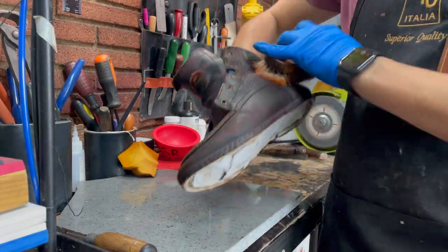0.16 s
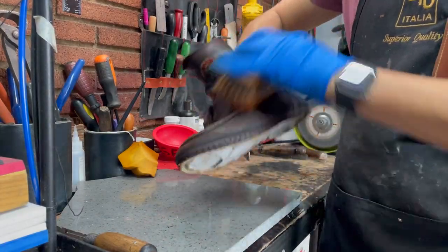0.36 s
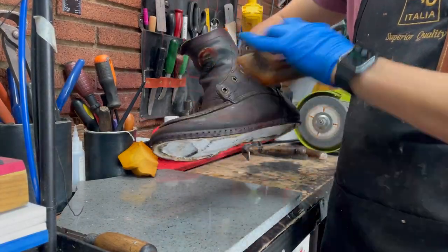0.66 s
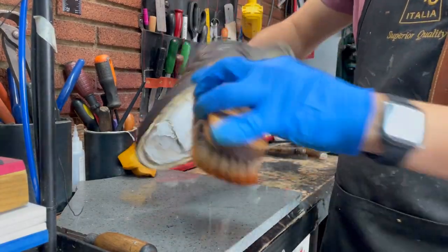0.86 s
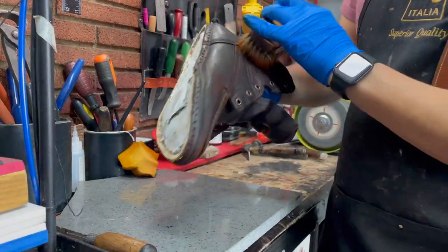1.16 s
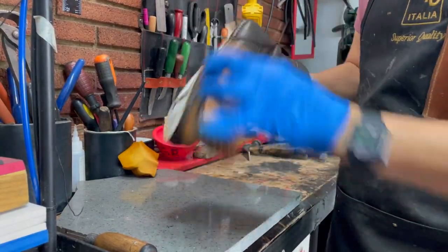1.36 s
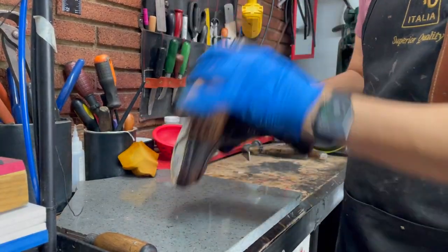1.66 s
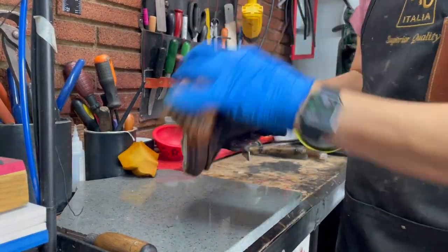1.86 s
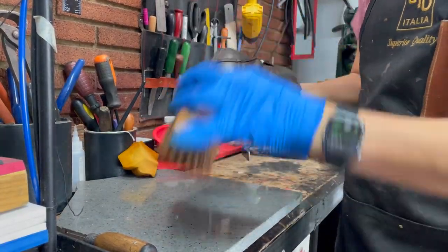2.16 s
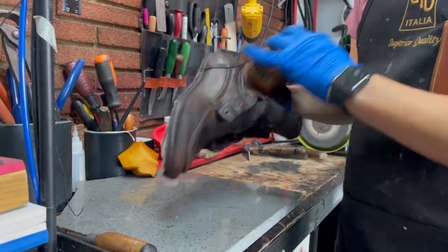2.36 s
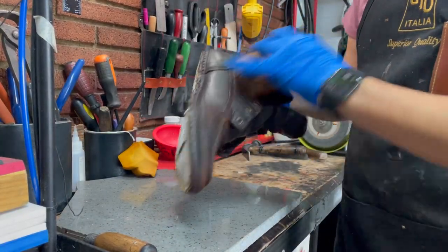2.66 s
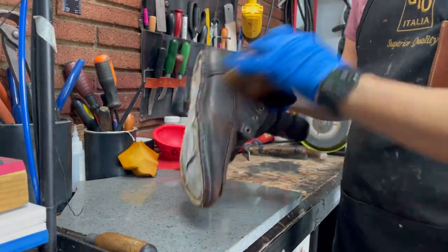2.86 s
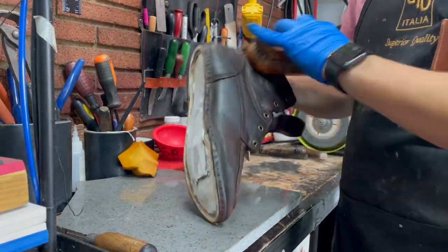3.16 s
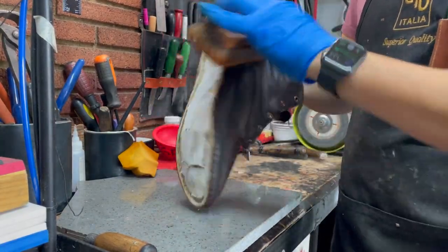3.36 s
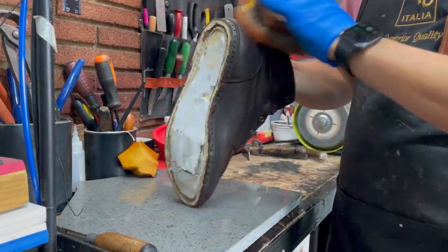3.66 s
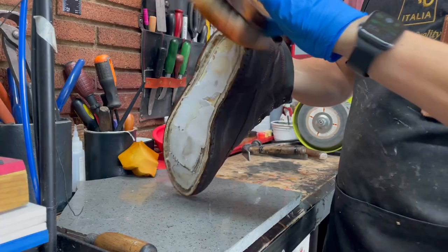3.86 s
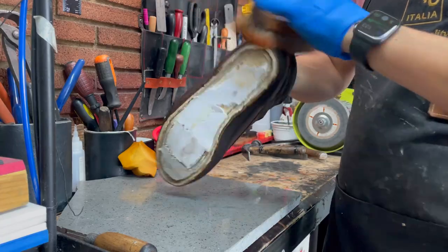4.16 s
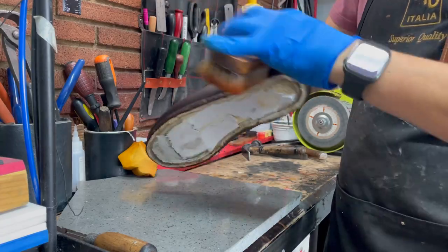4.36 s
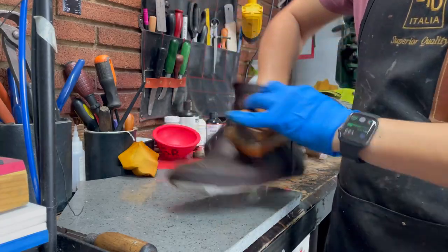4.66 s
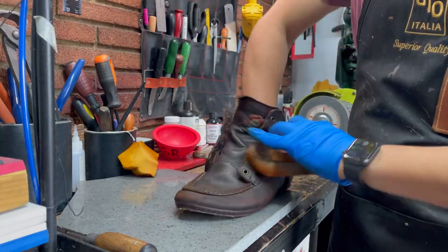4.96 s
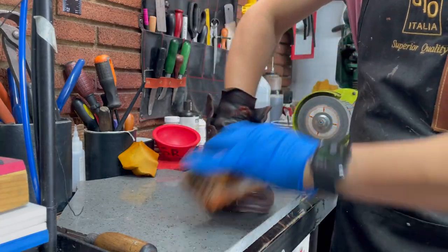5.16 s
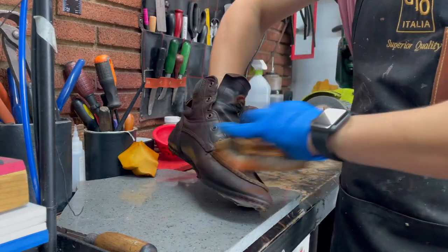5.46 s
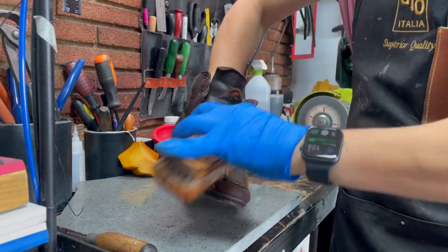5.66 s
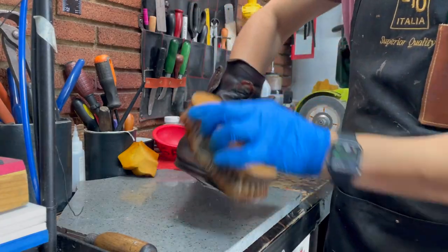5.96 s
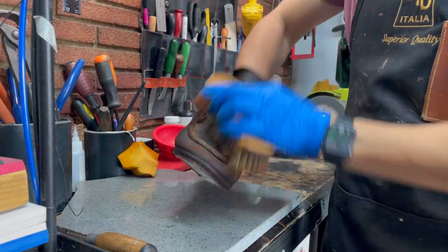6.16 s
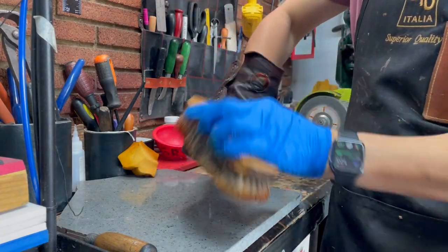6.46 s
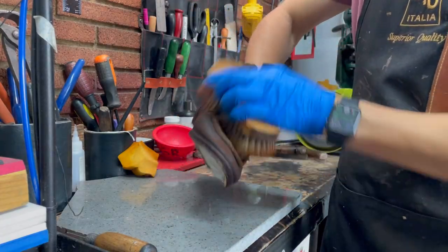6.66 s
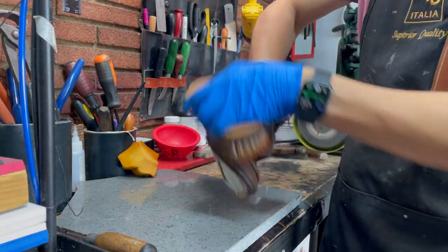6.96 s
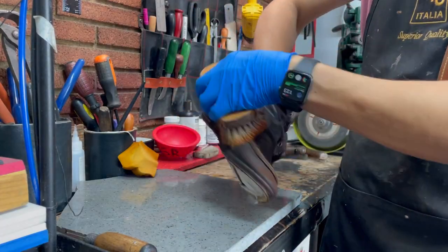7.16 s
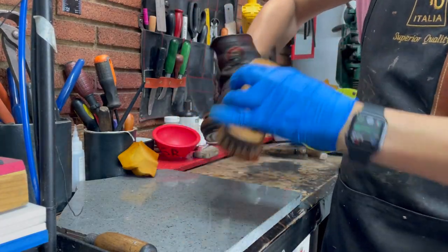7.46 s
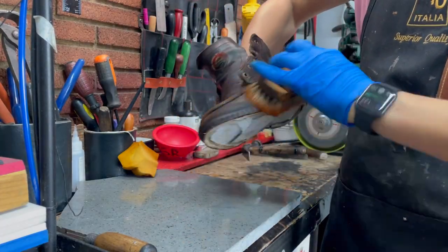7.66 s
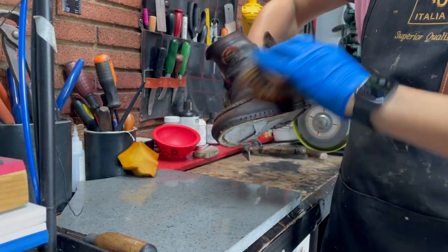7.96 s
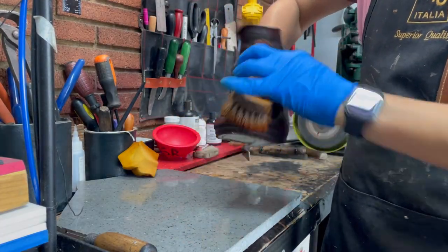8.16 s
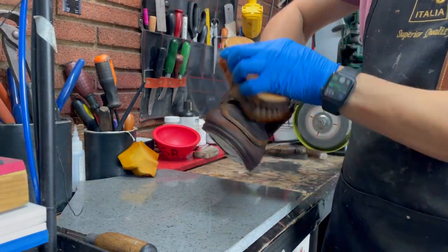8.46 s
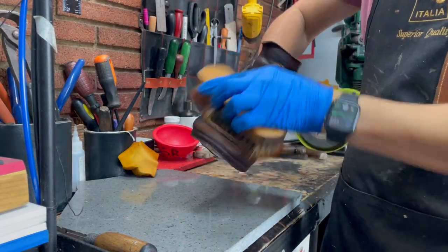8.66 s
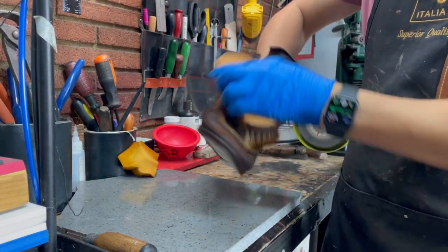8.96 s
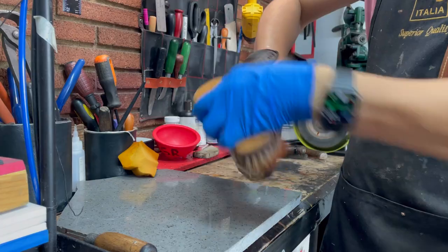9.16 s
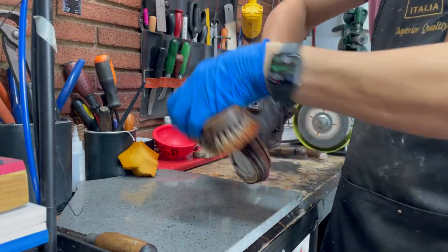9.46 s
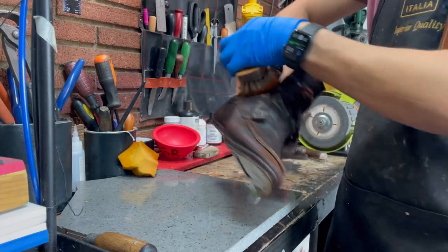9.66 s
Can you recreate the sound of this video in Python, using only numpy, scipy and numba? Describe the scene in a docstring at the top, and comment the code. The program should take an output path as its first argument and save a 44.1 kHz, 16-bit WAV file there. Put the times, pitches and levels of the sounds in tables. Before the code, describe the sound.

Close, rapid brushing on a hollow leather boot, hissing and rasping about seven strokes a second, with bumps and scuffs above a deep workshop hum.

```python
"""In a small workshop a bristle brush scrubs a leather boot close by, about seven strokes a second.
Bristle tips hiss as random clicks; pressed tufts rasp, and their drag drums on the boot's resonances.
Scuffs, scrapes and knocks are bursts or blows of force ringing in leather, eyelets or bench.
A motor hums as wavering sines, while traffic outside swells and fades as filtered noise and a low drone."""
import sys
import numpy as np
from scipy import signal
from scipy.fft import rfft, irfft, next_fast_len
from scipy.io import wavfile
from scipy.ndimage import uniform_filter1d
from numba import njit

SR = 44100
rng = np.random.default_rng(int(sys.argv[2]) if len(sys.argv) > 2 else 0)


def wav_out(sig):
    """Save sig, one row per channel (or a flat mono array), as 16-bit PCM at SR to the path in sys.argv[1]."""
    wavfile.write(sys.argv[1], SR, np.round(np.clip(np.atleast_2d(sig).T, -1, 1) * 32767).astype(np.int16))


N = 433062
TIME = np.arange(N) / SR

# All levels are mix levels; small trims follow in the functions.
# strokes, pushes and pulls alternating, levels relative to a typical stroke:
# (start [s], bristle hiss [dB], high swish [dB], tuft rasp [dB], boom of the boot [dB])
STROKES = [(0.038, 6.5, 9.5, -4, -11), (0.156, 7, 8, 2.0, -6), (0.292, 5, 6.5, 1, -5),
           (0.424, 7, 8, -1, -8), (0.562, 6, 6, -6, -4.5), (0.695, 7, 8, 3, -3), (1.033, 2, 4, 1, 0.5),
           (1.157, 6, 5.5, 6, 4), (1.301, -3.5, 3.5, 5, 4), (1.459, 2.5, 5, 6.5, 5), (1.598, -5, 1, 4, 1),
           (1.74, 1.5, 2.5, 4, 3), (1.908, 4.5, 4.5, -4, 3.5), (2.036, 4, 3.5, 3.5, -1),
           (2.198, 5.5, 4.5, 0.5, 0), (2.335, 5.5, 5.5, 4, 0.5), (2.488, 6, 6.5, 7, 4),
           (2.623, 6, 6, 5, 1.5), (2.767, 6, 5.5, 3.5, 3), (2.905, 5, 4.5, 6, 3.5), (3.05, 4, 4, 3.5, 3),
           (3.166, 0.5, 0, 4.5, 1.5), (3.316, -1, -1.5, 5.5, 3), (3.449, -3, -2, 1.5, -6),
           (3.57, -2.0, 0, -1, -1), (3.693, -3, -0.5, 1.5, 2.5), (3.832, -0.5, 1, -2, -6),
           (3.956, -2, 0.5, -6, 0), (4.089, -5.5, 0.5, 1.5, -7), (4.207, -2, 2, 0.5, 0.5),
           (4.342, 0, 1.0, 4, -2), (4.453, 4.5, 2.5, 1, -2), (4.586, -2, -0.5, 1, -13),
           (4.683, -4, -6.5, -1, 3.5), (4.772, -4, -4.5, 0, 1), (4.952, 0, 0.0, 2, 4),
           (5.113, -7, -6.5, 3, 3), (5.23, -8, -5.5, 1, 1.5), (5.38, -5.5, -5.5, -0.5, 3.5),
           (5.496, -6, -4, 4.5, 3), (5.64, -7, -4.5, 6.5, 0), (5.783, -1.5, -2, 6.5, 1),
           (5.925, -1, -2.5, 4.5, 0.5), (6.094, -0.5, -0.5, 5.5, -4), (6.234, -1, -2.5, 5, 0),
           (6.355, -0.5, -2, 3.5, -5), (6.507, 0.5, -1.5, 3, -5), (6.623, -3, -2.5, 2, 1.5),
           (6.769, -4.5, -3.5, -6, -4), (6.905, -4.0, -4.5, -10, -15), (7.037, -8, -5.5, -1, -11),
           (7.18, -7.5, -5, -5, -13), (7.322, -13, -8.5, -5, -10), (7.445, -13, -10, -12, -15),
           (7.536, -7.5, -3.5, -2.5, -2.5), (7.675, -7, -4.5, -3, -3), (7.796, -8, -3.5, -1, 1),
           (7.928, -2.5, -1, 1, -2.5), (8.071, -8, -5.5, 1.5, 1.5), (8.191, -7, -6.5, 1, -1),
           (8.312, -3.0, -5, -2.5, -1), (8.472, -3.5, -4, -2, -0.5), (8.605, -2, -4, 1, 1),
           (8.75, -4, -4, 4, -2), (8.883, -1.5, -3, -2, 3), (9.004, -5.5, -5.5, -1, 0),
           (9.125, 0.5, 0.5, 2, -5), (9.32, 4, 1, -13, 0.5), (9.479, 3, 0.5, -0.5, 4),
           (9.635, 3, 0.5, 2, 3)]
# shift of a stroke's fastest moment, later in pushes and earlier in pulls where positive:
# (time [s], shift [share of stroke])
SWING = [(0, 0.13), (1.1, 0.25), (3.1, 0.24), (3.7, 0.12), (4.34, 0.064), (4.45, -0.059), (4.68, -0.26),
         (4.77, 0.22), (4.95, 0.32), (5.25, 0.11), (7.5, 0.072), (9.6, 0.19)]
FASTEST_SHARE = 0.5  # of a stroke, before the shift
TIP_SWING = 0.78  # the free tips keep only this share of the shift, so the colour moves within each stroke
# after a turn the bristles only bend for this share of the run-up, then slip; a lower power bites harder
BEND_SHARE, BITE = 0.2, 0.59
# the brush leaves the boot once while it is turned over
LIFT_FROM_S, LIFT_TO_S, LIFT_DB = 0.834, 1.032, -7.5

# layer levels of the brush, before the stroke's own level [dB]
HISS_DB, SWISH_DB, RASP_DB, BODY_DB = -54, -53, -58, -54
SIZZLE_DB, SIZZLE_GROWTH = -54, 0.57  # the top sizzle follows the hiss, dB per dB
# extra top sizzle as the brush works over different parts of the boot: (time [s], level [dB])
SHEEN = [(0, -3), (1.2, 1.5), (1.35, 12), (1.7, 7), (2.1, 5), (3.35, 2), (3.7, 7), (4.25, 1), (4.7, -13),
         (5, 2), (7.45, 3), (7.6, 9), (7.95, 10), (8.2, -3), (9.3, 3), (9.8, -1)]
# light rustle of tips that stay on the leather: (time [s], level [dB])
RUSTLE = [(0, -69), (5.0, -64), (6.7, -71), (6.9, -67), (7.15, -67), (7.5, -69.5), (7.85, -66), (8.2, -66),
          (8.35, -69), (9.8, -74)]
# colours of the bristle sounds: (frequency [Hz], level [dB])
HISS_COLOUR = [(900, -35), (2000, -14.5), (3200, -6.5), (4200, -1), (5800, -2), (7000, 1.5), (8000, 3),
               (9000, -3), (11000, -50)]
SWISH_COLOUR = [(6500, -50), (8000, -12), (9000, 0), (10500, -2.5), (12500, -5), (14000, -16), (16000, -35)]
SIZZLE_COLOUR = [(11000, -41), (13000, -11), (14000, -5), (15500, 5.5), (17000, -4)]
RASP_COLOUR = [(150, 2), (400, -3.5), (900, -0.5), (1500, 5), (2200, 4.5), (2900, 2), (4000, -3.5),
               (7000, -9), (14000, -38)]
# rings of stiff single bristles snapping free: (frequency [Hz], level [dB])
SNAPS = [(2100, -1.5), (2700, 0.5), (3500, 1.5), (4400, -3.5), (5500, 1), (6800, 4)]
SNAP_DB, SNAPS_PER_S, SNAP_WIDTH_HZ = -58.5, 650, 560
# resonances of the hollow boot: (frequency [Hz], width [Hz], level [dB])
BOOT_MODES = [(203, 86, -16), (326, 58, -2), (417, 81, 2.5), (467, 73, -7), (541, 67, 1), (860, 220, -5.5)]

# tufts scraping over a seam or crease:
# (loudest moment [s], peak level [dB], centre [Hz], rise [s], fall to 1/e [s])
SCRATCHES = [(0.2, -45, 1980, 0.011, .01), (1.18, -38, 4320, 0.013, 0.018),
             (1.663, -36, 2357, .018, 0.0051), (1.665, -37.5, 676, .008, 0.011),
             (2.075, -41, 1920, 0.018, 0.027), (2.57, -38, 3900, 0.028, 0.016),
             (3.088, -37, 1700, .01, .018), (3.104, -32, 2350, .016, 0.017),
             (3.112, -41, 4200, 0.027, 0.013), (3.748, -46, 2605, .006, .008),
             (5.69, -41, 1299, .015, 0.035), (5.738, -37, 5000, 0.0046, 0.0078),
             (6.0, -42, 1305, .025, .02), (6.026, -40.5, 2590, 0.028, 0.036),
             (6.138, -38.5, 2410, 0.019, .025), (6.305, -42, 2096, .03, 0.037),
             (6.405, -41, 1350, 0.013, .012), (6.41, -44, 2900, 0.028, 0.014), (6.44, -38, 980, .01, .018),
             (6.537, -34, 917, .005, 0.0082), (6.572, -40, 2600, 0.028, 0.013),
             (6.785, -42, 4340, 0.0064, 0.016), (6.795, -45.5, 1600, .012, 0.018),
             (6.967, -46, 976, 0.0093, 0.017), (7.829, -41, 1540, 0.0097, 0.023),
             (8.19, -43, 2400, .03, 0.013), (8.517, -43.5, 1400, 0.0072, .014),
             (8.647, -39, 950, .005, 0.027), (8.695, -40, 2570, 0.029, .014),
             (8.819, -38, 900, 0.027, 0.013), (8.934, -42, 900, .012, 0.028),
             (8.962, -44, 2385, 0.018, .012), (9.17, -42, 954, 0.011, 0.018)]
SCRATCH_RISE_PER_S = 1.6  # the tufts stiffen as they bend, so the scrape climbs, in octaves per second
# the pressed brush catches and judders: (start [s], length [s], peak level [dB], pitch [Hz])
SCUFFS = [(0.038, 0.017, -42, 322), (0.172, 0.029, -38, 365), (0.3, 0.04, -41.5, 348),
          (0.457, .025, -45, 380), (0.712, 0.023, -43.5, 388), (1.656, 0.02, -42, 520),
          (2.232, 0.063, -41.5, 350), (2.546, 0.024, -46, 342), (2.676, 0.023, -41.5, 362),
          (2.817, 0.038, -37.5, 374), (3.082, 0.042, -44, 378), (5.541, .02, -45, 399.5),
          (5.657, .04, -39.5, 379), (5.965, 0.042, -38, 413), (6.145, .035, -40, 400),
          (6.26, 0.044, -36.5, 423), (6.392, 0.058, -38, 427), (6.542, 0.03, -34.5, 408.5),
          (7.053, 0.055, -42.5, 400), (7.949, 0.027, -42, 396), (8.236, .022, -45, 400),
          (8.403, 0.028, -39, 390), (8.509, 0.028, -39, 408), (8.643, 0.039, -37, 450),
          (8.78, 0.021, -34.5, 393), (8.81, 0.027, -39, 410), (8.92, 0.056, -36.5, 441),
          (9.059, 0.016, -43, 367), (9.152, 0.042, -40.5, 428)]
SCUFF_ATTACK_S, SCUFF_RELEASE_S = 0.0031, 0.0074
SCUFF_BEND = 0.11  # octaves the leather's pitch climbs as the brush presses through a scuff

# brush block and hand bumping the boot:
# (time [s], peak level [dB], pitch [Hz], flat slap against the ring [dB])
KNOCKS = [(0.906, -39, 540, -15), (0.919, -31.5, 517, -18.5), (1.043, -35.5, 326, -13),
          (1.222, -36, 385, -19), (1.616, -34, 423, -23), (2.108, -37.5, 372, -18), (2.966, -35, 340, -15),
          (3.054, -37, 419.7, -16), (3.890, -32.5, 350.6, -14), (4.681, -29.5, 370.7, -14),
          (4.692, -33.5, 490, -18), (4.847, -32, 526, -16), (5.027, -30.5, 360, -12),
          (5.198, -34.5, 420, -14), (6.266, -37, 433, -17), (8.232, -32.5, 416, -24),
          (8.401, -39, 397, -20), (8.672, -32.5, 437, -23)]
KNOCK_CONTACT_S = 0.012
KNOCK_SOFT_HZ = 890  # the leather cushions a knock above this
KNOCK_WIDTH_HZ = 68  # leather damps the ring within a few cycles
# the boot's heel meeting the bench: (time [s], peak level [dB])
THUDS = [(1.204, -40), (3.334, -37), (4.68, -39), (4.696, -31), (5.026, -38), (5.198, -31.5), (6.261, -37),
         (8.52, -41), (8.792, -40)]
# small hard ticks on the eyelets: (time [s], peak level [dB], contact too soft above [Hz])
TICKS = [(1.0405, -36, 14000), (3.8876, -26.5, 12000), (4.9136, -31, 2500)]
# resonances of an eyelet set in leather: (frequency [Hz], width [Hz], level [dB])
EYELET_MODES = [(1430, 410, -1), (2305, 800, -8), (3400, 470, 1), (6340, 870, -2), (10510, 1400, -10)]

# the bench top mirrors the brush: typical lag, spread of the lag as the hand moves, level
BENCH_LAG_S, BENCH_SHIFT_S, BENCH_DB = 0.0015, 0.0003, -12
# left-right phase and balance of the near sounds:
# (frequency [Hz], phase lead of left [radians], left minus right [dB])
STEREO_IMAGE = [(400, 0, -1), (1000, 0, -1), (1900, 0, 0.5), (2700, 0.55, 1.5), (4000, 0.15, 1),
                (5100, 0.7, 2), (6100, -0.1, 0.5), (7000, -1.4, 1.8), (7800, -2.95, 0), (8500, -3.35, 0),
                (9500, -4.4, 0), (11500, -6.28, 0), (13000, -7.65, 0), (14700, -9.3, 0), (16000, -9.7, 0)]
TOP_HZ = 15800  # the phone passes nothing much above this

# motor hum: (time [s], pitch [Hz], level [dB])
HUM = [(0.0, 61, -55), (0.19, 58.4, -51.5), (0.6, 58, -40.5), (1.54, 56.9, -38.5), (1.71, 59, -45),
       (1.76, 58.7, -60), (1.82, 55.8, -48), (1.95, 61.4, -51), (2.06, 59, -54.5), (2.5, 61.2, -50),
       (2.55, 57.2, -46), (2.74, 58.1, -42), (7.98, 57.4, -41.5), (9.75, 56.5, -42.5)]
HUM_DB = 0.16  # trim on the hum
# weaker machine tones: (frequency [Hz], level [dB], left-right phase [radians])
TONES = [(89.3, -62.5, 0.32), (117.2, -65.5, 1.06), (139.9, -65.5, 0.34), (456, -78, 1.1),
         (912, -68.5, 2.22)]
# swells of a higher hum that comes and goes: (middle [s], frequency [Hz], level [dB])
SWELLS = [(2.2, 226.8, -61), (4.1, 227.2, -56.5), (5.8, 225.8, -59), (7.9, 207.7, -62), (9.251, 228, -57.5)]
SWELL_S = 0.23  # time either side of the middle in which a swell falls to 1/e

# a vehicle passes outside: nearest moment, distance then, speed, and levels by layer
PASS_S, ROAD_M, SPEED_M_S = 5.1, 15.2, 10
TYRE_DB, RUMBLE_DB, DRONE_DB = -50, -50.5, -53.5
TYRE_LEAD_S = 1  # tyre noise is thrown ahead of the vehicle
ENGINE_FALL = 1.6  # the walls make the engine fade as this power of distance
DRONE_HZ, DRONE_GLIDE_HZ = 40.7, 3.7  # engine pitch when nearest, and its glide down as the vehicle goes by
# background colours: (frequency [Hz], level [dB])
TYRE_COLOUR = [(150, -5.5), (300, -5.5), (450, -3), (600, 0), (790, -3), (950, 0.5), (1130, -1),
               (1400, -7.5), (2500, -18), (5000, -32), (12000, -58)]
RUMBLE_COLOUR = [(20, -2), (32, -9), (42, -4), (70, 0.5), (90, -1), (110, -2), (140, -0.5), (200, -6.5),
                 (300, -7.5), (700, -65)]
ROOM_COLOUR = [(20, -20), (32, 9.5), (45, 10), (80, -0.5), (200, -1), (450, -5.5), (750, -11.5),
               (1100, -12.5), (2000, -13.5), (4000, -22), (9000, -54.5), (16000, -32)]


def brush():
    """Single tips hiss and swish, whole tufts catch and rasp, and their drag shakes the boot."""
    speed, tip_speed = stroke_speed(1), stroke_speed(TIP_SWING)
    hiss_db, swish_db, rasp_db, boom_db = stroke_levels()
    sheen_db, = curves(SHEEN)

    hiss = colour(flicks(4000 + 14000 * speed, spread_db=-1.5), HISS_COLOUR)
    hiss = patchy(hiss, depth_db=1.25, rate=74) * undb(HISS_DB + hiss_db)
    grain = snaps(speed) * undb(SNAP_DB + hiss_db)

    tips = flicks(6000 + 24000 * tip_speed, spread_db=1.5)
    swish = colour(tips, SWISH_COLOUR) * undb(SWISH_DB + swish_db)
    sizzle_db = SIZZLE_DB + SIZZLE_GROWTH * hiss_db + sheen_db
    sizzle = colour(tips, SIZZLE_COLOUR) * undb(sizzle_db)

    tufts = flicks(1800 + 4500 * speed, spread_db=2.5)
    rasp = patchy(colour(tufts, RASP_COLOUR), depth_db=1.0, rate=70) * undb(RASP_DB + rasp_db)

    drag = boot(flicks(900 + 2000 * speed, spread_db=1.5))
    body_colour = [(100, -1.0), (300, 5.5), (430, 4), (580, -1.0), (1000, 3.5), (3000, -27)]  # (Hz, dB)
    body = colour(drag, body_colour) * undb(BODY_DB + boom_db)

    catch = undb(0.5 * walk(190))  # tufts catch and let go together
    return catch * ((swish + sizzle) * friction(tip_speed, rest=0.2, power=1.98)
                    + (hiss + grain) * friction(speed, rest=0.15, power=2.4)
                    + rasp * friction(speed, rest=0.1, power=1.08, lead=0.0093)
                    + body * friction(speed, rest=0.29, power=0.98, lead=0.0059))


def current_stroke(start):
    """Index of the stroke under way at each sample."""
    return np.maximum(np.searchsorted(start, TIME) - 1, 0)


def stroke_speed(swing):
    """Brush speed, zero at each turn and 1 at the fastest moment."""
    start = np.transpose(STROKES)[0]
    end = np.append(start[1:], N / SR)
    end[np.searchsorted(start, LIFT_FROM_S) - 1] = LIFT_FROM_S
    direction = (-1) ** np.arange(len(start))  # push +1, pull -1
    shift = swing * direction * np.interp(start, *np.transpose(SWING))
    fastest = np.clip(FASTEST_SHARE + shift, 0.1, 0.9)
    k = current_stroke(start)
    done = np.clip((TIME - start[k]) / (end - start)[k], 0, 1)
    run_up = np.maximum((done / fastest[k] - BEND_SHARE) / (1 - BEND_SHARE), 0) ** BITE
    run_down = (1 - done) / (1 - fastest[k])
    return np.sin(np.pi / 2 * np.minimum(run_up, run_down))


def stroke_levels():
    """The level columns of the stroke under way; hiss, swish and rasp drop while the brush is lifted."""
    start, *columns = np.transpose(STROKES)
    k = current_stroke(start)
    lift_db = LIFT_DB * ((TIME > LIFT_FROM_S) & (TIME < LIFT_TO_S))
    drops = (lift_db, lift_db, lift_db, 0)
    return [uniform_filter1d(db[k] + drop, size=900) for db, drop in zip(columns, drops)]


def friction(speed, rest, power, lead=0):
    """Rubbing grows with speed, lead seconds early where pressure matters; bent bristles stir at the turn."""
    return rest + (1 - rest) * np.interp(TIME + lead, TIME, speed) ** power


def flicks(per_second, spread_db):
    """Bristle tips slipping free: random clicks of uneven size, mean power 1."""
    share = np.clip(per_second / SR, 1e-4, 1)
    chance, size, unevenness = rng.random((3, N))
    clicks = (chance < share) * np.tan(2.2 * (size - 0.5))
    uneven = undb(spread_db * np.sqrt(12) * unevenness)
    return unit(clicks * uneven / np.sqrt(share))  # rarer clicks are larger


def snaps(speed):
    """Stiff bristles of several lengths snap free in little bunches, each with a short ring."""
    rate = SNAPS_PER_S * (0.5 + speed)
    out = np.zeros(N)
    for hz, db in SNAPS:
        ring = resonate(flicks(rate, spread_db=-1.5), hz, SNAP_WIDTH_HZ)
        out += undb(db) * ring * undb(1.8 * walk(40))
    return unit(out)


def patchy(x, depth_db, rate):
    """Each half octave swells and fades by itself, as ever new tufts meet the leather."""
    size = next_fast_len(N)
    spectrum = rfft(x, size)
    bins = np.maximum(np.fft.rfftfreq(size, 1 / SR), 1)
    place = np.clip(2 * np.log2(bins / 700), 0, 8)  # half octaves above 700 Hz
    out = np.zeros(N)
    for k in range(9):
        band = irfft(spectrum * np.maximum(1 - np.abs(place - k), 0), size)[:N]
        out += band * undb(depth_db * walk(rate))
    return unit(out)


def boot(x):
    """The hollow boot's answer to a force."""
    return sum(undb(db) * resonate(x, hz, width) for hz, width, db in BOOT_MODES)


def rustle():
    """Bristle tips keep stirring on the leather, a thin hiss of sparse clicks."""
    db, = curves(RUSTLE)
    return colour(flicks(2500, spread_db=0), HISS_COLOUR) * undb(db + 2 * walk(35))


def scratches():
    """A seam bends many tufts alike, so they snap over it with a gritty scrape that climbs in pitch."""
    out, grit = np.zeros(N), flicks(3000, spread_db=0)
    t = TIME[:SR // 6]
    for s, db, hz, rise, decay in SCRATCHES:
        envelope = np.minimum(t / rise, np.exp((rise - t) / decay))
        force = grit[int(s * SR):][:len(t)] * envelope
        centre = hz * 2 ** (SCRATCH_RISE_PER_S * (t - rise))
        scrape = sweep(sweep(force, centre, 0.3 * hz), centre, 0.9 * hz)
        add(out, s - rise, scrape, db - 1.0)
    return out


def scuffs():
    """The brush bites, then slips in quick jerks that make the leather groan, higher as it is stretched."""
    out, jerks = np.zeros(N), flicks(1500, spread_db=0.0)
    t = TIME[:SR // 5]
    for s, length, db, hz in SCUFFS:
        release = np.exp(-np.maximum(t - length, 0) / SCUFF_RELEASE_S)
        grip = np.minimum(t / SCUFF_ATTACK_S, 1) * release
        force = lowpass(jerks[int(s * SR):][:len(t)] * grip, 1700)
        centre = hz * 2 ** (SCUFF_BEND * (np.minimum(t / length, 1) - 0.5))
        groan = resonate(sweep(force, centre, 100.), hz, width_hz=600)
        add(out, s, groan + undb(-19.5) * force, db)
    return out


def blow(contact, rub):
    """The force of a blow: one sharp push, then a dying scuff."""
    t = TIME[:6000]
    force = rub * rng.standard_normal(len(t)) * np.exp(-t / max(contact, 1e-4))
    force[0] += 1
    return force


def knocks():
    """Cushioned blows ring the struck stretch of leather at its own pitch, with a slap and the boot's boom."""
    out = np.zeros(N)
    for s, db, hz, slap_db in KNOCKS:
        force = lowpass(blow(KNOCK_CONTACT_S, rub=0.048), KNOCK_SOFT_HZ)
        panel = resonate(resonate(force, hz, KNOCK_WIDTH_HZ), hz, width_hz=640)
        slap = undb(slap_db) * resonate(force, hz=794, width_hz=1600)
        boom = undb(-10.0) * resonate(boot(force), hz=466, width_hz=520)
        add(out, s, panel + slap + boom, db + 0.36)
    return out


def thuds():
    """The heel strikes the bench: short blows through two low, broad resonances."""
    out = np.zeros(N)
    for s, db in THUDS:
        low_ring = resonate(blow(0.0026, rub=0.028), hz=160, width_hz=88)
        add(out, s, resonate(low_ring, hz=195, width_hz=120), db - 0.3)
    return out


def ticks():
    """Very short hard blows ring the eyelet's resonances."""
    out = np.zeros(N)
    for s, db, soft_hz in TICKS:
        force = lowpass(blow(0.0012, rub=0.07), soft_hz)
        ring = sum(undb(mode_db) * resonate(force, hz, width) for hz, width, mode_db in EYELET_MODES)
        add(out, s, ring, db)
    return out


def bench(x):
    """The hard bench top returns the sound a moment later; the colour shifts as the hand moves."""
    lag = BENCH_LAG_S + BENCH_SHIFT_S * walk(12)
    gain = undb(BENCH_DB)
    mirrored = np.interp(TIME - lag, TIME, lowpass(x, 7000))
    return (x + gain * mirrored) / np.hypot(1, gain)


def stereo_image(x):
    """Left and right are nearly in step in the bass and drift out of step in the treble."""
    size = next_fast_len(N)
    hz, lead, balance_db = np.transpose(STEREO_IMAGE)
    bins = np.fft.rfftfreq(size, 1 / SR)
    lead = np.interp(bins, hz, lead)
    half = undb(np.interp(bins, hz, balance_db) / 2)
    left_right = np.array([half * np.exp(1j * lead), 1 / half])
    return irfft(rfft(x, size) * left_right, size)[:, :N]


def workshop(x, t60, wet_db, dull_hz):
    """Short diffuse reflections from cluttered walls, weaker in the treble."""
    t = TIME[:SR // 2]
    tail = rng.standard_normal((2, len(t))) * undb(-60 * t / t60) * (t > 0.003)
    tail = lowpass(tail / np.sqrt(np.sum(tail ** 2) / 2), dull_hz)
    return undb(wet_db) * signal.fftconvolve(x[None], tail, axes=1)[:, :N]


def motor():
    """A deep, wavering hum with fainter machine tones above it, one of which comes and goes."""
    hz, db = curves(HUM)
    hum_db = db + HUM_DB + 0.5 * walk(16) + np.array([[-0.2], [0.2]])  # left, right
    out = unit(np.sin(2 * np.pi * np.cumsum(hz) / SR)) * undb(hum_db)

    middle, swell_hz, swell_db = np.transpose(SWELLS)
    swelling = undb(-66.5)  # the higher hum never quite stops
    for s, peak_db in zip(middle, swell_db):
        swelling = swelling + undb(peak_db) * np.exp(-((TIME - s) / SWELL_S) ** 2)

    tones = [(tone_hz, undb(tone_db), lead) for tone_hz, tone_db, lead in TONES]
    tones.append((np.interp(TIME, middle, swell_hz), swelling, 1.1))
    for tone_hz, gain, lead in tones:
        phase = 2 * np.pi * np.cumsum(tone_hz + 2.213 * walk(9)) / SR
        tone = unit(np.sin(phase + np.array([[lead], [0]])))
        waver_db = 1.04 * walk(3.4) + 3.5 * walk(22) + np.array([[-1.6], [1.6]])
        out = out + gain * tone * undb(waver_db)
    return out


def nearness(t):
    """The passing vehicle's amplitude by distance, 1 when nearest."""
    return ROAD_M / np.hypot(ROAD_M, SPEED_M_S * (t - PASS_S))


def traffic():
    """A vehicle passes beyond the walls: tyre noise, rumble and an engine drone that glides down."""
    engine = nearness(TIME) ** ENGINE_FALL
    receding = nearness(TIME) * SPEED_M_S * (TIME - PASS_S) / ROAD_M  # negative approaching, positive leaving
    drone_hz = DRONE_HZ - DRONE_GLIDE_HZ * receding

    tyres = stereo_noise(TYRE_COLOUR, width=1.34) * nearness(TIME + TYRE_LEAD_S)
    tyres = tyres * undb(TYRE_DB + 2.1 * walk(21))
    rumble_db = RUMBLE_DB + np.array([[-1.2], [1.2]])  # left, right
    rumble = stereo_noise(RUMBLE_COLOUR, width=0.96) * engine * undb(rumble_db)
    drone = np.sin(2 * np.pi * np.cumsum(drone_hz + 1.43 * walk(7.1)) / SR)
    drone = drone * engine * undb(DRONE_DB + 4.6 * walk(4.6))
    return tyres + rumble + drone


def room_tone():
    """The workshop's steady air noise."""
    return undb(-53.5) * stereo_noise(ROOM_COLOUR, width=0.74)


def stereo_noise(points, width):
    """Coloured noise that is alike in both ears in the bass and diffuse higher up."""
    mid, side = rng.standard_normal((2, N))
    side = signal.sosfilt(signal.butter(1, 330, "high", fs=SR, output="sos"), side)
    return colour(mid + width * side * np.array([[1], [-1]]), points)


def undb(db):
    """Decibels to gain."""
    return np.exp(np.asarray(db) * (np.log(10) / 20))


def unit(x):
    """Scale to rms 1."""
    return x / np.sqrt(np.mean(x ** 2))


def curves(table):
    """The columns of a timed table, one value per sample."""
    s, *columns = np.transpose(table)
    return [np.interp(TIME, s, c) for c in columns]


def walk(rate):
    """Slow chance: smoothed random levels, rms 1, about rate new values a second."""
    knots = np.arange(N) * rate / SR
    steps = rng.standard_normal(4096)[knots.astype(int) % 4096]
    return unit(uniform_filter1d(steps, int(SR / rate)))


def colour(x, points):
    """Filter by a spectrum of (Hz, dB) points; rms 1."""
    size = next_fast_len(N)
    hz, db = np.transpose(points)
    bins = np.maximum(np.fft.rfftfreq(size, 1 / SR), 1)
    gain = undb(np.interp(np.log(bins), np.log(hz), db))
    return unit(irfft(rfft(x, size) * gain, size)[..., :N])


def resonate(x, hz, width_hz):
    """One resonance, gain 1 at its centre."""
    return signal.lfilter(*signal.iirpeak(hz, hz / width_hz, fs=SR), x)


@njit
def sweep(x, hz, width_hz):
    """A resonance whose centre moves, gain 1 at the centre."""
    y, band, low = np.empty(len(x)), 0., 0.
    for i in range(len(x)):
        g, k = np.tan(np.pi * hz[i] / SR), width_hz / hz[i]
        v = (band + g * (x[i] - low)) / (1 + g * (g + k))
        band, low, y[i] = 2 * v - band, low + 2 * g * v, k * v
    return y


def lowpass(x, hz):
    """Two-pole low-pass."""
    return signal.sosfilt(signal.butter(2, hz, fs=SR, output="sos"), x)


def add(track, s, sound, db):
    """Place a short sound at time s with the given peak level."""
    start = int(s * SR)
    track[start:start + len(sound)] += (undb(db) * sound / np.abs(sound).max())[:N - start]


def scene():
    """Brush and boot up close, their reflections, then motor, traffic and room."""
    near = bench(brush() + rustle() + scratches()) + scuffs() + knocks() + thuds() + ticks()
    direct = undb(-1.21) * stereo_image(near)
    reflections = workshop(near, t60=0.19, wet_db=-8.0, dull_hz=4020)
    return direct + reflections + motor() + traffic() + room_tone()


def record(dry):
    """The phone cuts the top with a steep low-pass."""
    return signal.sosfilt(signal.ellip(10, 0.1, 80, TOP_HZ, fs=SR, output="sos"), dry)


dry = scene()
out = record(dry)
wav_out(out)
```